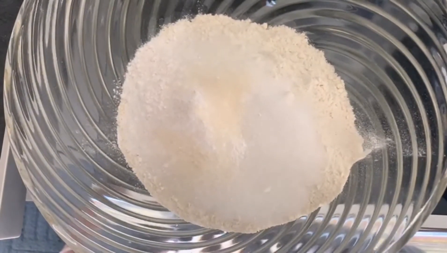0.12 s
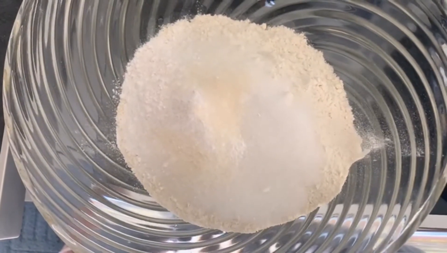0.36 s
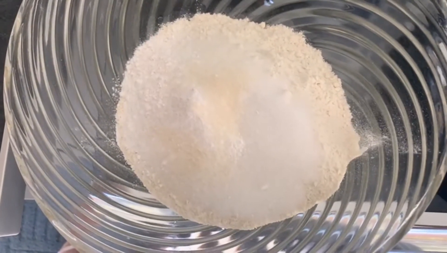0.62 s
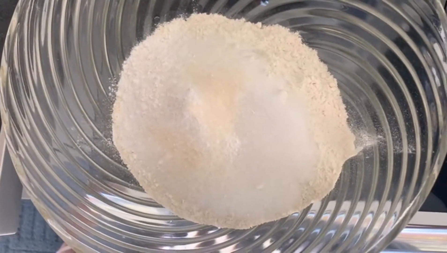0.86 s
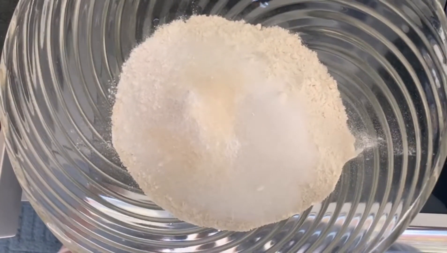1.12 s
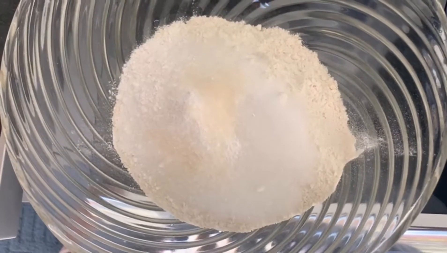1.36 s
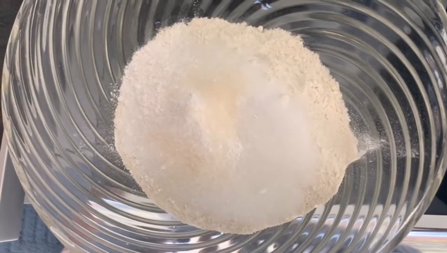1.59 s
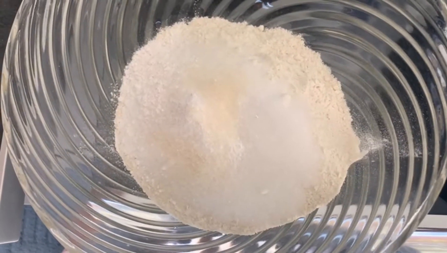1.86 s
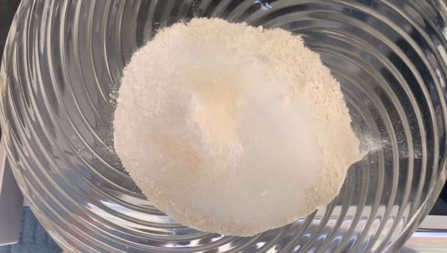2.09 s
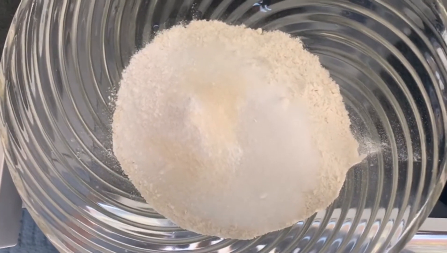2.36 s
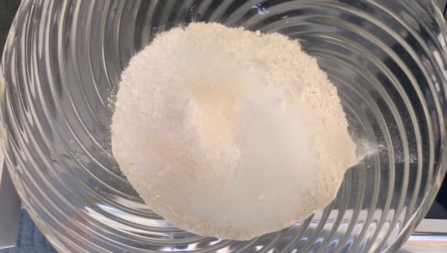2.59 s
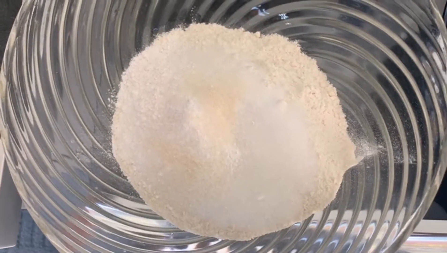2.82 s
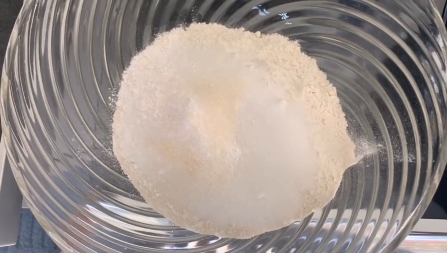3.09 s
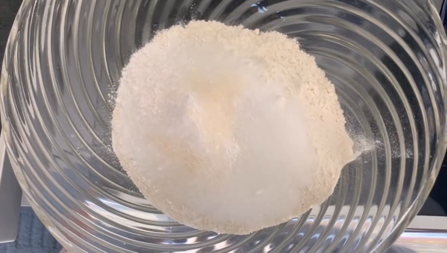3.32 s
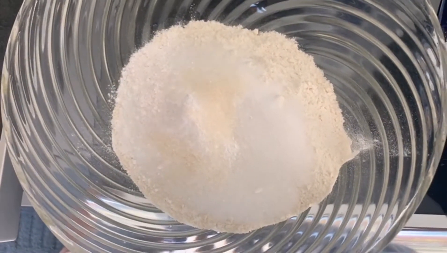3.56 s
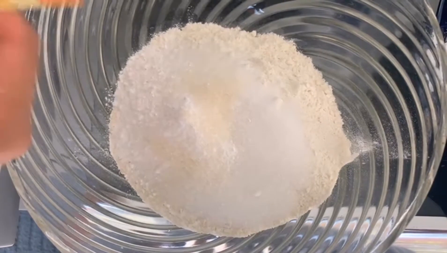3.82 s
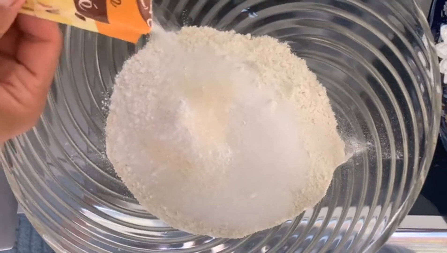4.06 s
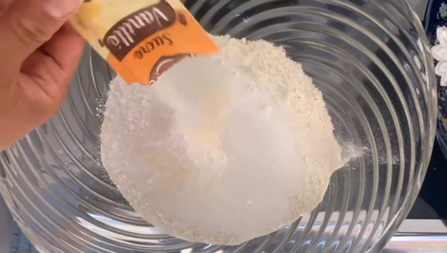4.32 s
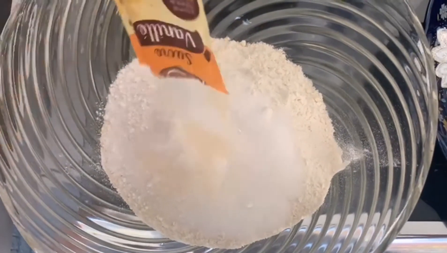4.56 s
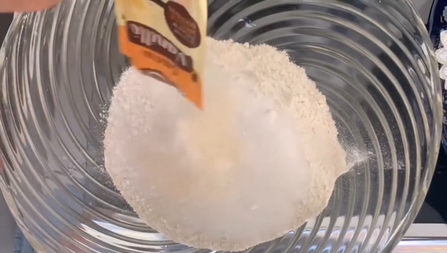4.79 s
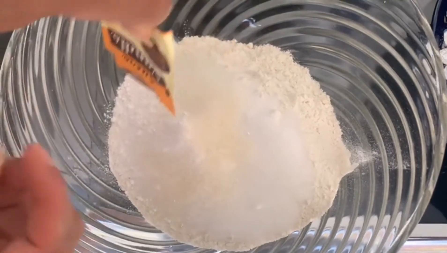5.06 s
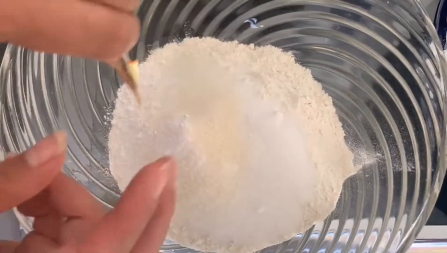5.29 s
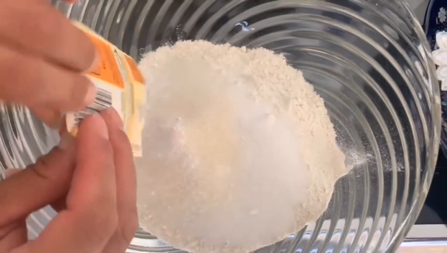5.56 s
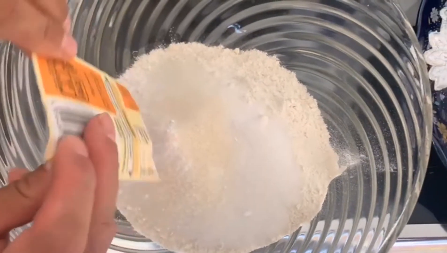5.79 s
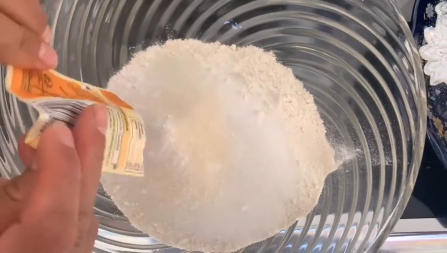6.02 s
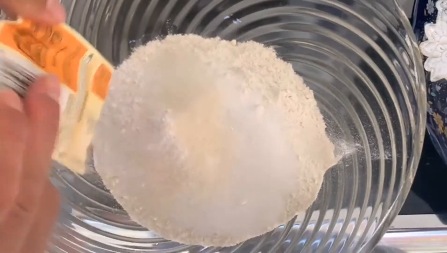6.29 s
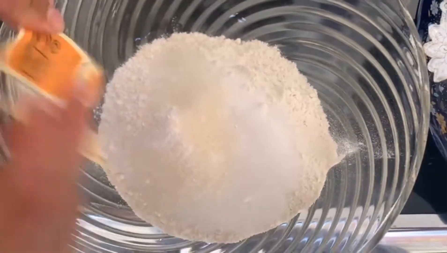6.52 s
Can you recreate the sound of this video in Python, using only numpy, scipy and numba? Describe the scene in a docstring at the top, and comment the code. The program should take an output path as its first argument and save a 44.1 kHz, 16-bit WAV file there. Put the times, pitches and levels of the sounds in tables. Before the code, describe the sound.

Close, dry paper crinkles and snaps in irregular bursts, fine sugar patters out softly, and dense, sharp crackling with dull thuds ends it.

```python
"""Hands turn, tear and shake small paper sachets of sugar over a glass bowl, close to a phone in a quiet kitchen.
From the start room air hisses, a fridge drones faintly and the worktop rumbles: all shaped noise.
Paper rustles and creases snap from the first moments: bursts of noise shake the resonances of the paper.
From 2.2 s sugar slides in the sachet, then pours until 5.3 s: noise in fine grains through resonances.
From 6 s snaps come thick and fast, and the worktop thuds hardest; the phone blends its two ports in the treble."""
import sys
import numpy as np
from scipy import signal
from scipy.fft import rfft, irfft, next_fast_len
from scipy.io import wavfile
from scipy.ndimage import uniform_filter1d, map_coordinates
from numba import njit

SR = 44100
rng = np.random.default_rng(int(sys.argv[2]) if len(sys.argv) > 2 else 0)


def bounce(signal):
    """Save signal as a 16-bit WAV file at the path given by the first command-line argument."""
    frames = np.transpose(np.atleast_2d(signal))
    limited = np.clip(frames, -1, 1)
    pcm = np.round(limited * 32767).astype(np.int16)
    wavfile.write(sys.argv[1], SR, pcm)


def decibels_to_gain(level_db):
    """Convert a level in decibels to a linear amplitude gain (20 dB per decade)."""
    exponent = np.asarray(level_db, float) / 20
    return 10 ** exponent


N = 293309  # length in samples


def band(x, hz, width):
    """Two-pole resonance, gain 1 at the centre."""
    return signal.lfilter(*signal.iirpeak(hz, hz / width, SR), x)


@njit
def bend(x, hz, width):
    """State-variable resonance whose centre moves, gain 1 at the centre."""
    y = np.empty_like(x)
    for c in range(len(x)):
        b, l = 0., 0.  # band and low-pass states
        for i in range(x.shape[1]):
            g, k = np.tan(np.pi * hz[i] / SR), width / hz[i]
            v = (b + g * (x[c, i] - l)) / (1 + g * (g + k))
            b, l, y[c, i] = 2 * v - b, l + 2 * g * v, k * v
    return y


def walk(rate):
    """Random levels held 1 / rate s and slewed twice; spread near 1."""
    hold = int(SR / rate)
    steps = np.repeat(rng.standard_normal(N // hold + 1), hold)
    return 1.3 * uniform_filter1d(uniform_filter1d(steps, hold), hold)[:N]


def ring(x, modes, colour_db=None):
    """Sum of resonances of alternating sign; colour_db shakes each by its own gain and lets its pitch wander."""
    total = 0
    for k, (hz, width, db) in enumerate(modes):
        if colour_db is None:
            mode = band(x, hz, width)
        else:
            centre = hz * (1 + 0.025 * walk(25))  # bending detunes the mode
            mode = bend(x * decibels_to_gain(colour_db[k]) + 1e-18, centre, float(width))
        total = total + (-1) ** k * decibels_to_gain(db) * mode
    return total


def part(x, ranged_modes, colour_db=None):
    """One vibrating part: its modes, within its range."""
    edges, modes = ranged_modes
    within = signal.butter(3, edges, "band", fs=SR, output="sos")
    return signal.sosfilt(within, ring(x, modes, colour_db))


def unit(x):
    """Scale to rms 1."""
    return x / np.sqrt(np.mean(x ** 2))


def curve(table):
    """Columns of a table, sample by sample."""
    s, *columns = np.transpose(table)
    return [np.interp(np.arange(N) / SR, s, c) for c in columns]


def swell(s, rise_s, t60_s):
    """Gain that climbs through 60 dB to 1 at time s and then dies away."""
    t = np.arange(N) / SR - s
    return decibels_to_gain(60 * np.minimum(t / rise_s, -t / max(t60_s, .02)))


def ports_apart(db):
    """Gains of the left and right port, the right one db louder."""
    return decibels_to_gain(db * np.array([[-.5], [.5]]))


def pair(noise, alike):
    """Noise for two ports, partly shared."""
    return alike * noise[0] + np.sqrt(1 - alike ** 2) * noise[1:]


def grains(per_s, spread_db, smear_ms):
    """Random tiny impacts, a few much larger than the rest: the envelope of short puffs, rms 1."""
    size_db = np.minimum(spread_db * rng.exponential(size=N), 5 * spread_db)
    hits = (rng.random(N) < per_s / SR) * decibels_to_gain(size_db)
    decay = np.exp(-1000 / (smear_ms * SR))
    return unit(np.sqrt(signal.lfilter([1], [1, -decay], hits ** 2)))


KITCHEN_DB = -68.5  # rms of the air at both ports, before it wavers
# Spectrum of the air around the phone. Each row: frequency in Hz, relative level in dB per Hz.
AIR_SPECTRUM = [(30, -22), (55, -33), (108, -16.5), (253, -14), (333, -14.5), (497, -18), (706, -22.5),
                (800, -27), (6500, -32), (9500, -56), (12000, -56.5), (15600, -82)]


def kitchen_air():
    """Unsteady air and machine noise: white noise shaped in the spectrum, separate at each port."""
    hz, db = np.transpose(AIR_SPECTRUM)
    f = np.fft.rfftfreq(N, 1 / SR) + 1  # keeps the logarithm finite
    shape = decibels_to_gain(np.interp(np.log(f), np.log(hz), db))
    air = irfft(rfft(rng.standard_normal((2, N))) * shape, N)
    return decibels_to_gain(KITCHEN_DB + 2.0 * walk(18)) * unit(air)


# Drone of the fridge. Each row: frequency in Hz, width in Hz of each of two passes, rms level in dB before it wavers.
FRIDGE_MODES = [(225.5, 36.4, -69)]


def fridge():
    """Faint wavering drone: noise passed twice through a resonance, nearly equal at both ports."""
    drone = 0
    for hz, width, db in FRIDGE_MODES:
        once = band(rng.standard_normal(N), hz, width)
        drone = drone + decibels_to_gain(db) * unit(band(once, hz, width))
    return drone * decibels_to_gain(2.0 * walk(15)) * ports_apart(0.8)


THUD_RISE_S, WORKTOP_AT_REST_DB = 0.13, -70  # rise through 60 dB; middle of the wavering rumble
# Resonances of the worktop under the phone. Each row: frequency in Hz, width in Hz, level in dB.
WORKTOP_MODES = [(52.7, 16, 2.5), (84, 30.4, -1), (120, 53, -3.5), (235, 66, -20)]
# Its upper modes, driven apart. Each row: frequency in Hz, width in Hz, level in dB.
WORKTOP_UPPER_MODES = [(120.5, 9.9, 5.8), (223, 55, 2.2)]
# Hands and bowl bump the worktop. Each row: time of the peak in seconds, t60 in seconds, level in dB,
# upper modes in dB above it.
WORKTOP_THUDS = [(.48, 0.33, -55, -3), (.625, 0.89, -51.5, -16), (3.45, 1.1, -65, -11),
                 (4.02, 1.9, -62, -1.5), (4.334, 0.81, -57, 7), (5.892, 0.18, -66, -13),
                 (6.02, 0.4, -59.5, -5), (6.18, 0.44, -49, -9), (6.3, 0.28, -45, -25), (6.43, .6, -49, -6),
                 (6.498, 0.32, -39.5, -7.5), (6.62, 1.2, -52, -7)]


def worktop():
    """The worktop rumbles at rest and thuds when bumped: swelling noise through its low modes."""
    mid, side = ring(ring(rng.standard_normal((2, N)), WORKTOP_MODES), [(76.5, 90, 0)])
    low = unit(mid + 0.17 * side * np.array([[1], [-1]]))
    high = unit(ring(ring(rng.standard_normal(N), WORKTOP_UPPER_MODES), [(160, 210, 0)]))
    low_power = decibels_to_gain(WORKTOP_AT_REST_DB + 3.5 * walk(9)) ** 2
    high_power = 0
    for s, t60, db, upper_db in WORKTOP_THUDS:
        thud = swell(s, THUD_RISE_S, t60)
        low_power = low_power + (decibels_to_gain(db) * thud) ** 2
        high_power = high_power + (decibels_to_gain(db + upper_db) * thud) ** 2
    return (np.sqrt(low_power) * low + np.sqrt(high_power) * high) * ports_apart(1.4)


def powers(sheet_db, body_db, edge_db):
    """Power that goes to body, sheet and edge; body and edge are given relative to the sheet."""
    return decibels_to_gain(sheet_db + np.array([[body_db], [0], [edge_db]])) ** 2


RUSTLE_RISE_S = 0.17  # rise of body and sheet through 60 dB
EDGE_HASTE = 1.043  # the bright edge rises and settles this much faster than sheet and body
# Each grip, fold or tear of the fingers sets off a crowd of small creases that settles again.
# Each row: time of its height in seconds, settling t60 of body and sheet in seconds, sheet drive in dB,
# hollow body in dB above it, bright edge in dB above it.
FINGER_RUSTLES = [(0.027, 0.61, -55, -6, 0), (0.113, 0.4, -49.5, -4, -29), (0.332, 0.76, -47, -4.5, 1),
                  (0.473, 0.57, -46, -4, -3), (.587, 0.27, -48, -13, 1), (0.797, 0.14, -47, -10, -0.5),
                  (0.875, 0.21, -52.5, -7.5, -9), (1.041, 0.4, -53.5, -4, -16),
                  (1.118, 0.74, -54, -2.5, -2), (1.206, 0.5, -62, -10, 2), (1.269, 0.4, -46, 0, -13),
                  (1.618, 3.4, -58.5, -25, -6), (1.7, 0.25, -42.5, -5.5, 4.5), (1.89, 0.85, -52.5, -11, -1),
                  (2.024, 0.15, -51.5, -5.5, 7), (2.166, 1.1, -52, -6, -5.5), (2.479, 1.3, -56, -33, 1),
                  (2.62, 0.51, -54, -13, 0), (2.766, 0.23, -47, -35, 7.5), (2.79, 0.31, -37.5, -36, -9),
                  (2.818, 0.17, -38.5, -8, -1), (3.069, 0.17, -60.5, 5.5, -34),
                  (3.178, 0.38, -49.5, -4.5, -16), (3.405, 0.27, -56, -11, -2), (3.52, 0.36, -63.5, -8, 6),
                  (3.59, 2.5, -62, 0, -2), (3.653, 0.19, -45, -15.5, 1), (3.77, 0.52, -55, -1, 0),
                  (4.309, 0.66, -49, -3, -37), (5.204, 0.42, -61, -4, 2.5), (5.544, 1.4, -48, -7.5, -0.5),
                  (5.721, 0.28, -58, 1.5, 14), (5.861, 0.093, -45, -1, 1.5), (5.945, 0.58, -54, -7, 7.5),
                  (6.038, 0.19, -37.5, -7.5, 6.5), (6.13, 0.59, -44.5, -4, -2), (6.181, 0.12, -38, -18, 1),
                  (6.23, 3.8, -47.5, -10, -1), (6.337, 0.43, -45.5, 2.5, 4), (6.47, 0.98, -48, -11, 4),
                  (6.519, 0.78, -36.5, -25, 0)]


def handling():
    """How hard the fingers shake body, sheet and edge: gains from summed powers of swells."""
    power = 0
    for s, t60, *db in FINGER_RUSTLES:
        slow = swell(s, RUSTLE_RISE_S, t60) ** 2
        quick = swell(s, RUSTLE_RISE_S / EDGE_HASTE, t60 / EDGE_HASTE) ** 2
        power = power + powers(*db) * np.array([slow, slow, quick])
    return np.sqrt(power)


SNAP_STRAIN_S, SNAP_FLIP_S = .005, .0011  # rise through 60 dB; smoothing of the flip
SNAP_T60_S, SHIVER_DB, SHIVER_T60_S = .008, -17, .035  # first fall, then the weaker, longer shiver
# Creases that buckle. Each row: time in seconds, peak sheet drive in dB, hollow body in dB above it,
# bright edge in dB above it.
CREASE_SNAPS = [(0.109, -38, 4, -7), (0.307, -31.5, -20, -0.5), (0.3495, -35.5, -19, 0),
                (0.372, -37, -9, 4.5), (0.451, -46, -4, -3), (0.4863, -39, -3, 3), (0.5126, -37, -24, -2),
                (0.5586, -35, -14, -19), (0.5774, -30, -10, 5.5), (0.746, -45, 3, -4),
                (0.7838, -36, -10.5, 0), (0.852, -43.5, -16, 4.5), (0.864, -38.5, -13.5, -1.5),
                (1.0263, -37.5, -1.5, -35), (1.0444, -36, -16, -25), (1.1098, -40, -14, -15),
                (1.187, -40, -6, -13), (1.2341, -27, -3, -8.5), (1.2712, -33, -0.5, -2),
                (1.315, -41.5, -4, -25), (1.6088, -44.5, -25, 0), (1.6844, -29, -6, 5.5),
                (1.9134, -34, -11.5, -10), (1.987, -38, -4, -7.5), (2.0144, -43, -18, -9),
                (2.152, -37.5, -4, -1.5), (2.17, -34, -8.5, -12), (2.2632, -56, -35, 14),
                (2.275, -48, -28, -15), (2.3169, -42, -19, 13.5), (2.322, -38, -28, 8),
                (2.332, -42, -28, 4), (2.631, -44.5, -17.5, -22), (2.749, -35.5, -33, 1),
                (3.158, -35.5, -1, -4.5), (3.394, -43, -11, 1.5), (3.5091, -41.5, -9, -7),
                (3.605, -44, -3, -5), (3.621, -49.5, -10, 5), (3.657, -36, -7.5, -23),
                (3.754, -49, -4, -21), (3.81, -40.5, -1, -16), (4.2969, -25.5, 1.5, -20),
                (4.323, -39, -13, -18), (4.653, -51.5, 13.5, -8), (4.9685, -56, -32, 21),
                (5.1945, -41.5, -1.5, -10.5), (5.487, -46, -5, -4.5), (5.5176, -34, -4, -11),
                (5.534, -48.5, 9, -8), (5.556, -28.5, -8, 0), (5.647, -52, 9.5, 14),
                (5.7147, -42, -2.5, -10), (5.867, -59.5, 9, 3), (5.932, -41, -25, 4.5),
                (6.019, -21.5, -13.5, 4.5), (6.032, -15, -11, 2.5), (6.039, -29, -11, 3),
                (6.045, -22.5, -20, 5), (6.1215, -35.5, -11, -22), (6.129, -38, 12.5, -9),
                (6.1444, -30, -15, -2), (6.17, -19.5, -6.5, 4.5), (6.1722, -33.5, 2, 8),
                (6.181, -37, -13, 5.5), (6.1862, -21.5, -15, 5.5), (6.2234, -28.5, -1, 9.5),
                (6.258, -26.5, -5, -1), (6.264, -34, -12, -11), (6.3094, -33, 0.5, 0),
                (6.3254, -27, -6.5, -0.5), (6.3355, -29, -18, -2), (6.3466, -25, -22, 1),
                (6.3547, -37, -13, 0), (6.388, -23.5, -6.5, -14.5), (6.3942, -19.5, -9, 1.5),
                (6.405, -32, -6, 7), (6.416, -39.5, 5.5, 11), (6.462, -27, -9, -3.5), (6.485, -31, -2, -9),
                (6.4962, -24, -10, -4), (6.503, -21.5, -6.5, -12), (6.516, -18, -3, 2.5),
                (6.5228, -28, 0, 6.5), (6.5377, -20.5, -6.5, 7), (6.558, -29.5, 1, 0),
                (6.568, -19, -9, 0.5), (6.5904, -25.5, -9.5, 8), (6.599, -20.5, -10.5, -5.5),
                (6.613, -38, -2, 14.5), (6.6436, -38, -1, 4)]


def snaps():
    """Strain builds for a moment, the crease flips, the flap shivers on (power on body, sheet, edge)."""
    power = np.zeros((3, N + 4096))  # room for a last snap past the end
    t = np.arange(-512, 2048) / SR
    after = decibels_to_gain(-60 * t / SNAP_T60_S) + decibels_to_gain(SHIVER_DB - 60 * t / SHIVER_T60_S)
    shape = np.where(t < 0, decibels_to_gain(60 * t / SNAP_STRAIN_S), after)
    shape = uniform_filter1d(shape, int(SNAP_FLIP_S * SR))
    shape = shape / shape.max()
    for s, *db in CREASE_SNAPS:
        i = int((s + .0005) * SR) - 512  # the flip comes half a millisecond after s
        power[:, i:i + len(t)] += powers(*db) * shape ** 2
    return power[:, :N]


SLACK_MODE, TAUT_MODE, DEEP_MODES = 2, 3, 2  # two sheet modes by index; number of deepest body modes
BODY_LEFT_DB = 1.5  # the hollow body is louder at the left port
# Share that both phone ports hear the same, 0 to 1. In order: body, sheet, edge.
PORTS_ALIKE = (0.85, 0.55, 0.77)
# How the sachet is held. Each row: time in seconds, lead of the taut sheet mode over the slack one in dB
# added to their own levels, gain on the deepest body modes in dB.
GRIP = [(0, -5.5, -13), (1.2, -8, -9), (1.7, -11, -3), (2.6, -22.5, -8), (2.78, 1.5, -7), (3.1, -14, -1.5),
        (4.3, -1, -3.5), (5.4, -4.5, -1.5), (6.0, -1, -3), (6.65, -5.5, 3.5)]
# What the paper rings with, in three parts. Each: range as lowest and highest Hz, then rows of modes.
# Each row: frequency in Hz around which the mode wanders, width in Hz, level in dB.
PAPER_BODY = (262, 1960), [(339, 370, -4), (466, 166, 1), (648, 180, -4), (869, 177, 0.5),
              (1051, 312, -0.5)]
PAPER_SHEET = (1250, 4600), [(1598, 240, 4.2), (1810, 116, 6.7), (2330, 670, 0.94), (2820, 148, 13.84),
               (4280, 3000, 1.9), (4054, 100, 9.56)]
PAPER_EDGE = (3650, 12900), [(5040, 1800, -4.5), (6060, 1630, -2), (7490, 1400, -3.5), (8550, 1320, 1),
              (9610, 1480, -2), (10920, 1840, -6.5)]


def paper():
    """Single creases snap over crowds of small ones; all shake the same paper."""
    creases = grains(600, spread_db=2.4, smear_ms=.7) * decibels_to_gain(1.2 * walk(40))
    force = np.sqrt(snaps() + (handling() * creases) ** 2)
    noise = rng.standard_normal((3, N))
    taut_db, deep_db = curve(GRIP)
    sound = 0
    paper_parts = (PAPER_BODY, PAPER_SHEET, PAPER_EDGE)
    for push, which, alike, fickle_db in zip(force, paper_parts, PORTS_ALIKE, (2.5, 2.5, 2.0)):
        # the folds keep changing, so every crackle favours other modes
        colour_db = np.array([fickle_db * walk(60) - fickle_db / 2 for _ in which[1]])
        if which is PAPER_SHEET:
            colour_db[SLACK_MODE] -= taut_db / 2
            colour_db[TAUT_MODE] += taut_db / 2
        if which is PAPER_BODY:
            colour_db[:DEEP_MODES] += deep_db
            push = push * ports_apart(-BODY_LEFT_DB)
        rung = part(push * pair(noise, alike), which, colour_db)
        sound = sound + rung / np.std(part(noise[0, :SR], which))  # level for steady noise: 1
    return sound


POUR_S, HEAP_DB = 3.6, 8  # from then on grains land on the heap, which lifts the lowest grain mode
SUGAR_ALIKE = 0.42  # share that both ports hear the same
# Sugar slides inside the sachet, later pours out. Each row: time in seconds, hiss drive in dB before it wavers.
SUGAR_FLOW = [(2.235, -81), (2.255, -43), (2.312, -43.5), (2.335, -34.5), (2.41, -53.5), (2.621, -44),
              (2.718, -53), (2.8, -100), (3.86, -100), (3.942, -44.5), (4.025, -35.5), (4.188, -47),
              (4.36, -40.5), (4.46, -42), (4.52, -42), (4.56, -46.5), (4.635, -35), (4.71, -45),
              (4.75, -39.5), (4.8, -39), (4.835, -49.5), (4.86, -41), (4.885, -51.5), (4.905, -44.5),
              (5.0, -63), (5.05, -53), (5.135, -74), (5.3, -98)]
# What running sugar sounds through: range as lowest and highest Hz, then rows of modes.
# Each row: frequency in Hz around which the mode wanders, width in Hz, level in dB.
GRAIN_MODES = (270, 13400), [(1018, 345, -19), (1760, 240, -9.5), (2750, 760, -5), (4250, 1280, -3),
               (6430, 1440, -1), (8700, 1940, 4.5), (10700, 6800, -1)]


def sugar():
    """Fine grains patter on paper and heap: puffs of noise through resonances; the flow is uneven."""
    flow_db, = curve(SUGAR_FLOW)
    patter = grains(3000, spread_db=1.4, smear_ms=.3) * decibels_to_gain(flow_db + 1.2 * walk(30))
    noise = rng.standard_normal((3, N))
    colour_db = np.array([1.5 * walk(20) for _ in GRAIN_MODES[1]])
    colour_db[0] += HEAP_DB * (np.arange(N) > POUR_S * SR)
    rung = part(patter * pair(noise, SUGAR_ALIKE), GRAIN_MODES, colour_db)
    return rung / np.std(part(noise[0, :SR], GRAIN_MODES))


def room(x, bowl_t60_s, bowl_db, t60_s, level_db):
    """Quick echoes in the bowl, then the kitchen's short tail: decaying noise, different at each port."""
    t = np.arange(SR // 2) / SR
    fall = decibels_to_gain(bowl_db - 60 * t / bowl_t60_s) + decibels_to_gain(level_db - 60 * t / t60_s)
    echo = rng.standard_normal((2, len(t))) * fall * np.minimum(t / .002, 1)
    damp = 0.04  # one-pole dulling of the echoes
    echo = signal.lfilter([1 - damp], [1, -damp], echo)
    return signal.fftconvolve(x, echo, axes=1)[:, :N]


# Where the sachet is, close to the phone. Each row: time in seconds, delay of the right port after the left in ms.
SACHET_PLACE = [(0, .42), (3.7, .42), (4.1, .12), (5.3, .06), (5.8, .27)]


def scene():
    """Paper and sugar reach the left port first, then echo; the kitchen lies beneath."""
    left, right = paper() + sugar()
    delay_ms, = curve(SACHET_PLACE)
    late = map_coordinates(right, [np.arange(N) - delay_ms * SR / 1000], order=3)
    direct = np.array([left, late])
    echoes = room(direct, bowl_t60_s=.03, bowl_db=-30, t60_s=.22, level_db=-40)
    return direct + echoes + kitchen_air() + fridge() + worktop()


# Treble blend of the phone's two ports. Each row: frequency in Hz, share of the left port in the right, 0 to 1,
# phase in half turns by which the left is turned back and the right forward.
PORT_BLEND = [(5000, 0, 0), (6500, .75, 0), (7400, .75, .24), (7900, .998, .5), (9200, .998, .5),
              (9800, .75, .75), (10500, .94, 1)]


def blend_ports(x):
    """The treble of both sides comes mostly from one port, turned in phase."""
    size = next_fast_len(N)
    hz, shared, half_turns = np.transpose(PORT_BLEND)
    f = np.fft.rfftfreq(size, 1 / SR)
    share = np.interp(f, hz, shared)
    turn = np.exp(1j * np.pi * np.interp(f, hz, half_turns) * np.array([[-1], [1]]))
    ports = rfft(x, size)
    ports[1] = share * ports[0] + np.sqrt(1 - share ** 2) * ports[1]
    return irfft(turn * ports, size)[:, :N]


def low_pass(x):
    """Removes everything above the highest recorded frequency."""
    return signal.sosfilt(signal.butter(12, 12850, fs=SR, output="sos"), x)


def record(dry):
    """The phone blends its ports in the treble and cuts the top above 11500 Hz steeply."""
    top_cut = signal.ellip(7, .5, 60, 11500, fs=SR, output="sos")  # .5 dB ripple, 60 dB down
    mix = signal.sosfilt(top_cut, blend_ports(dry))
    return low_pass(mix)


dry = scene()
out = record(dry)
bounce(out)
```